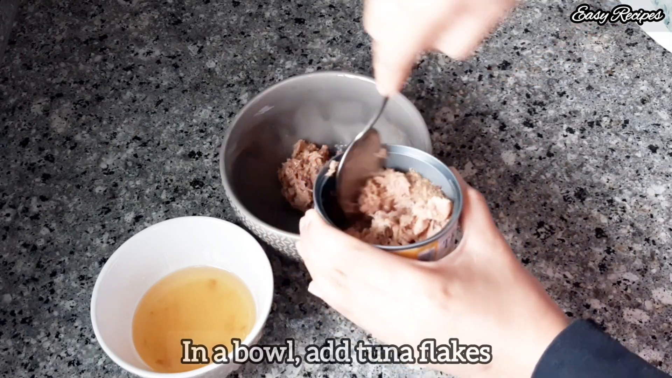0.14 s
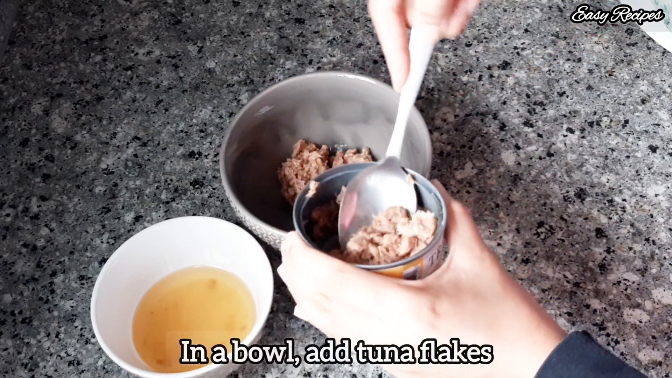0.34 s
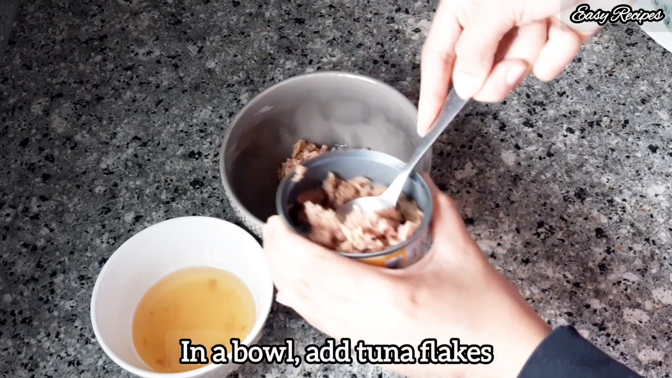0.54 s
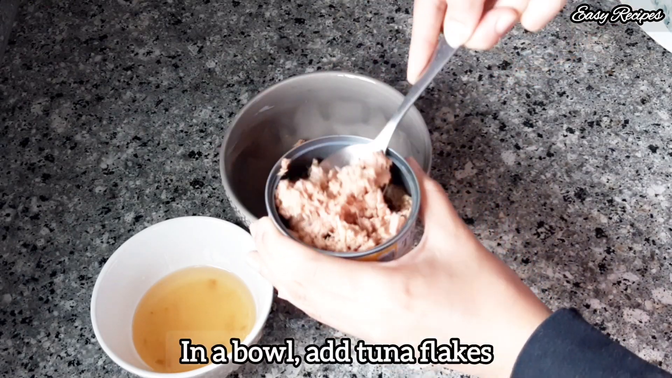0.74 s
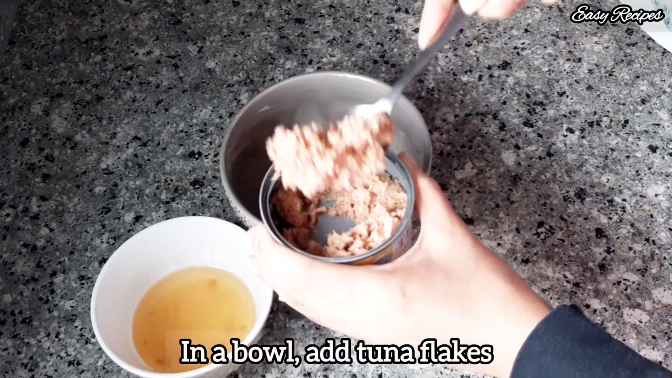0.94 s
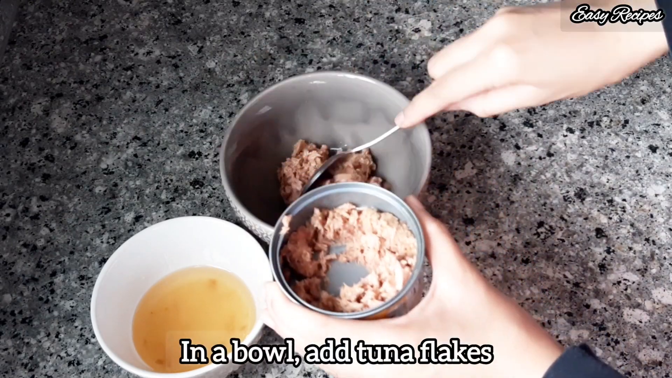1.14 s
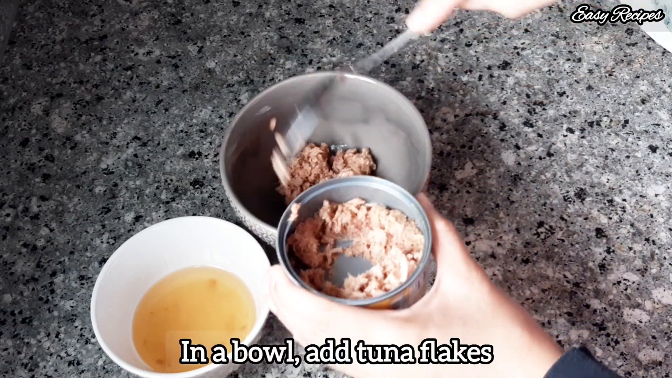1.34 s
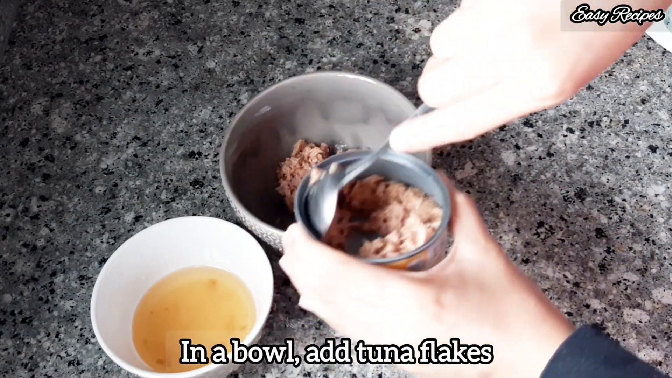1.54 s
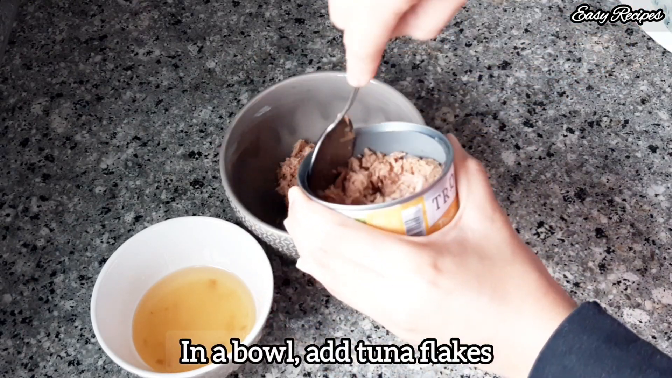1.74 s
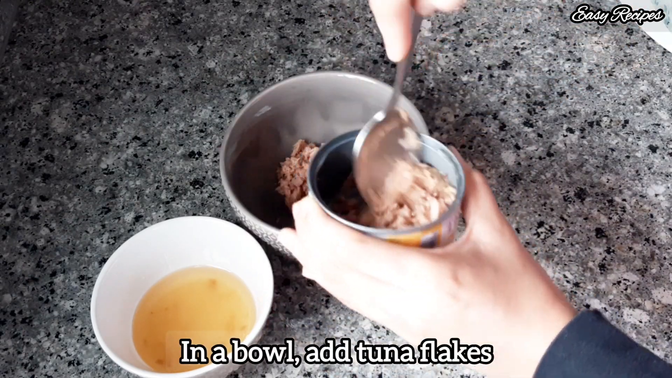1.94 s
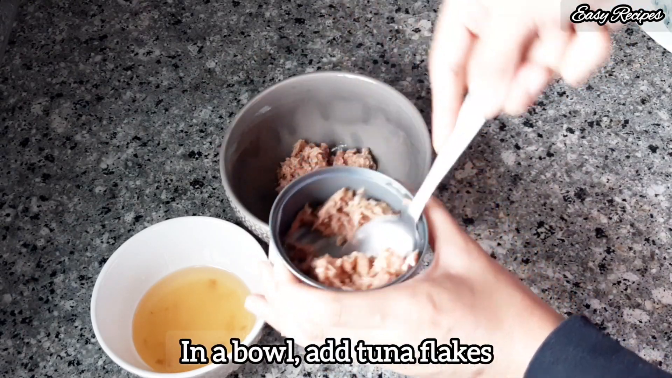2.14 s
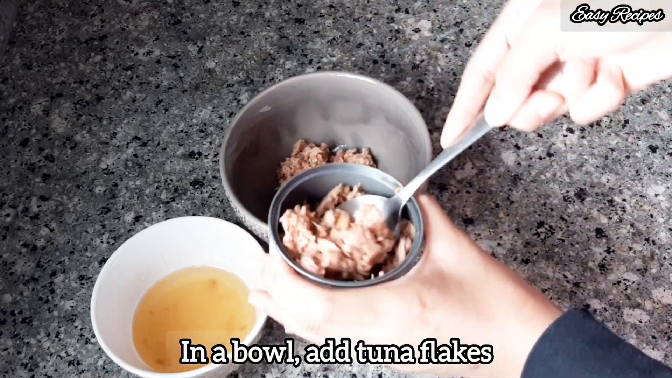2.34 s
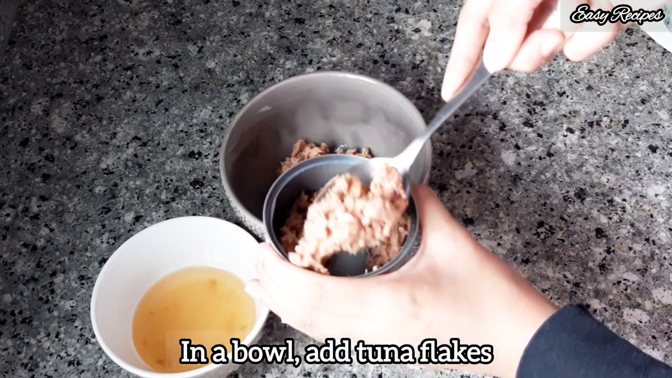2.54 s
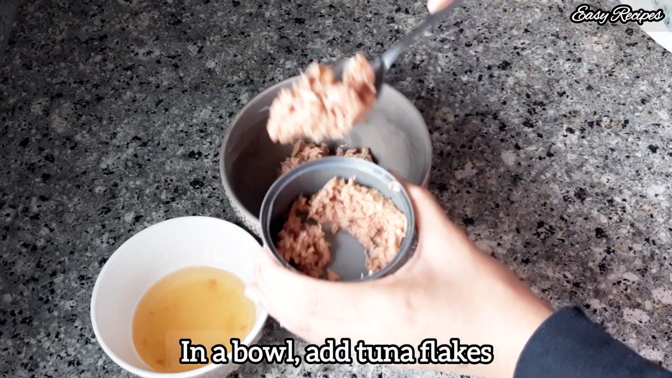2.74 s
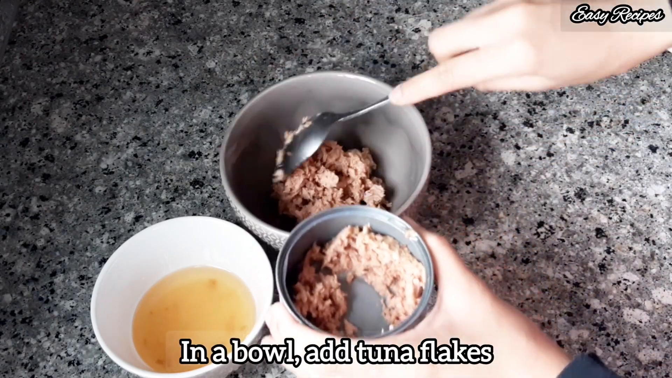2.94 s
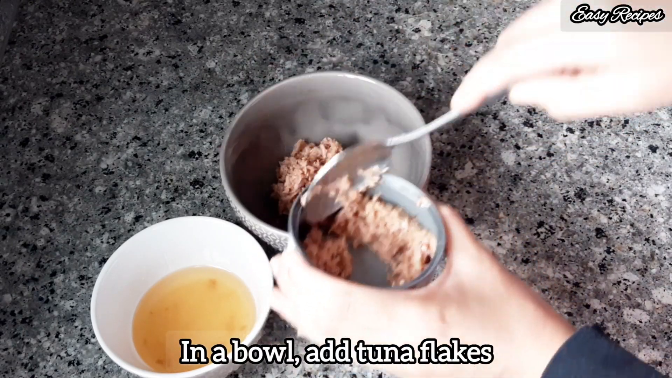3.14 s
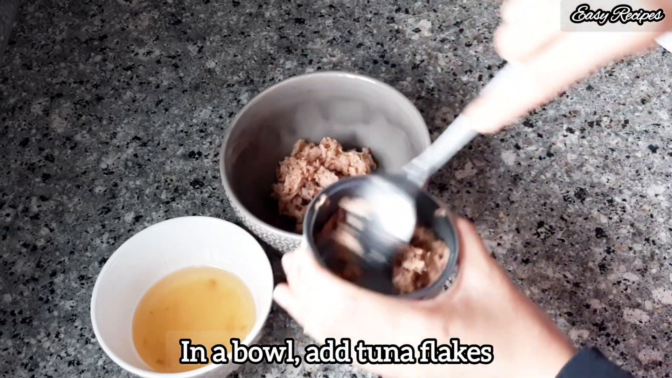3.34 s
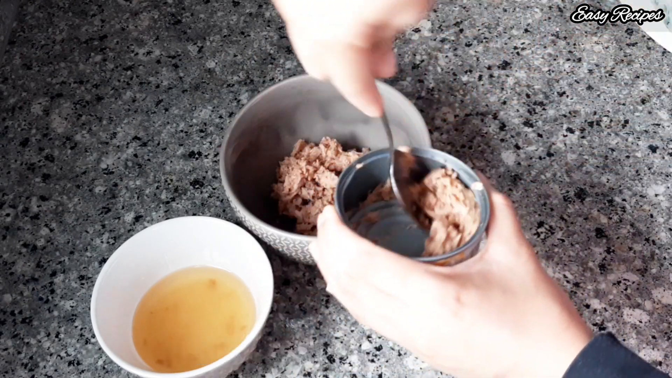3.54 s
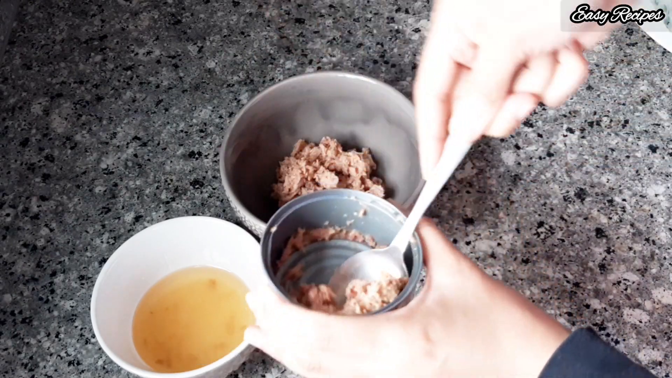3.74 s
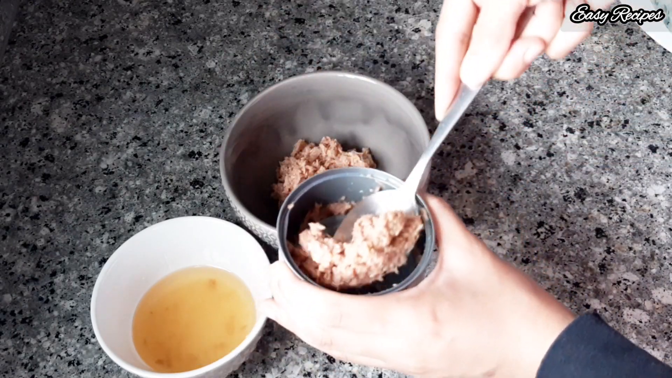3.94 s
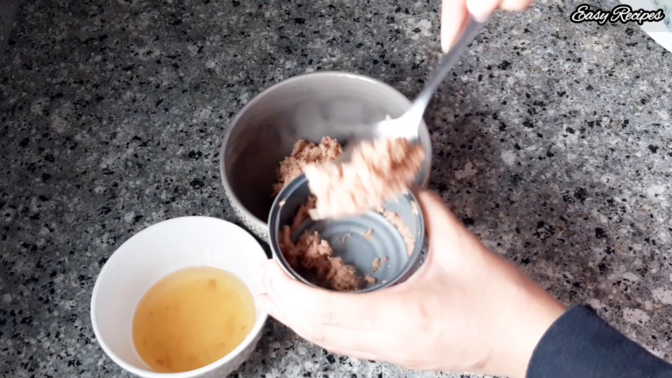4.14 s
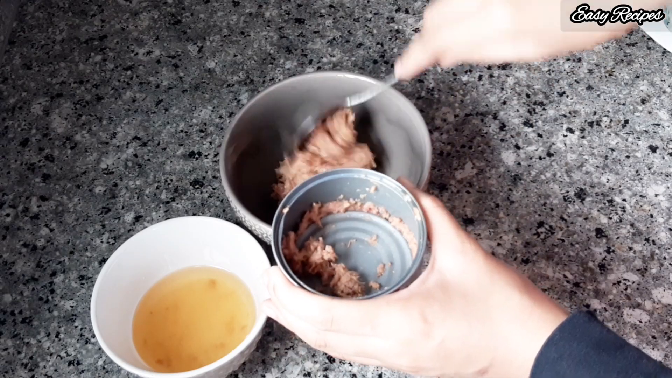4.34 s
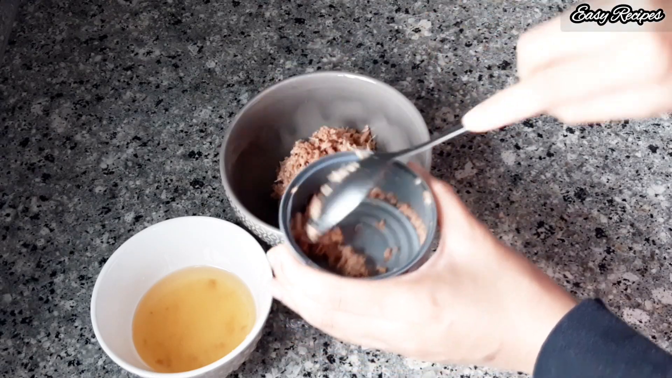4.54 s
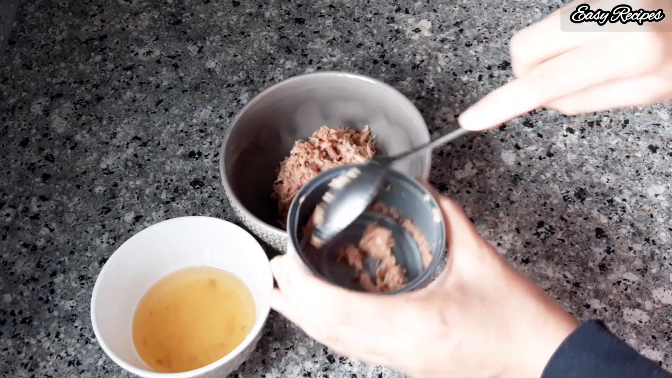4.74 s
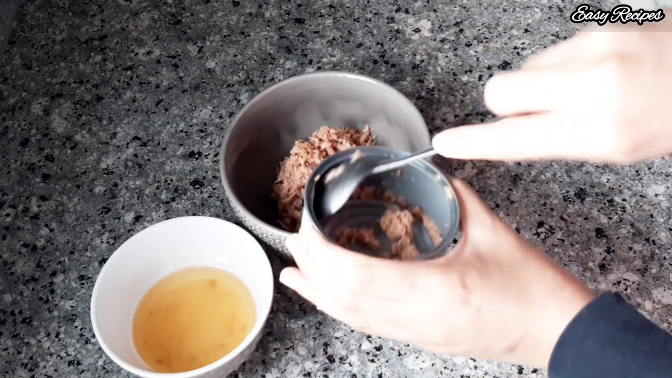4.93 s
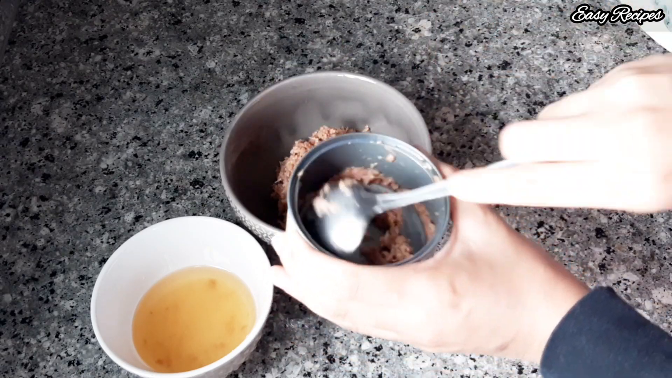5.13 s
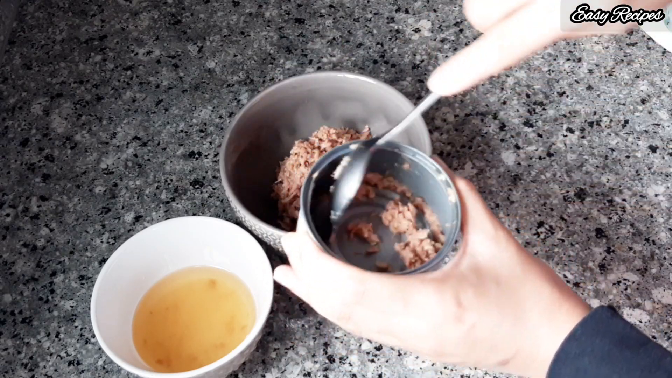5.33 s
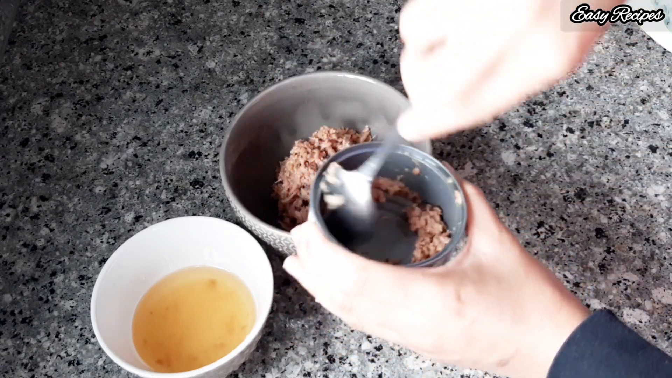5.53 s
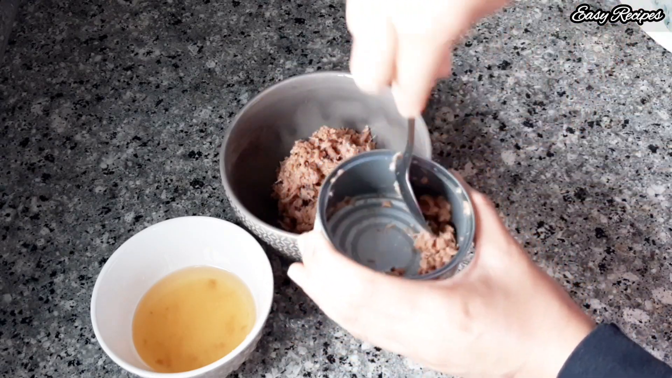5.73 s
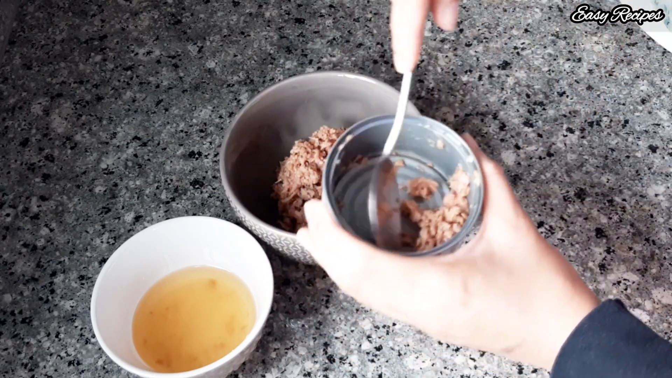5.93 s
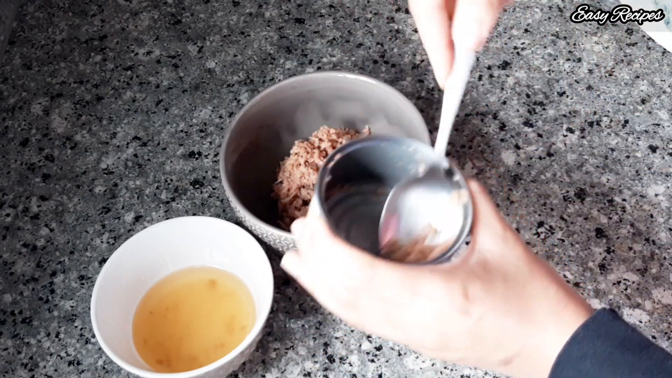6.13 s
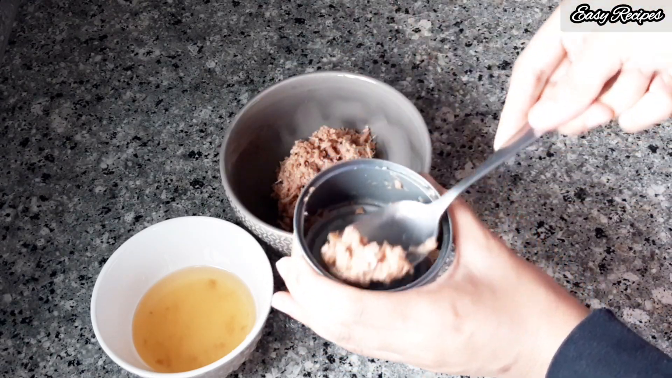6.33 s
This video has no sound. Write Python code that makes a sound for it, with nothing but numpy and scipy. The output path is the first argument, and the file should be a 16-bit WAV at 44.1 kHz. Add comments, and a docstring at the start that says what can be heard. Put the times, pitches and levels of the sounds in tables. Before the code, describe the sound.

A metal spoon knocks and scrapes softly inside a fish-filled tin, then clonks louder and rings more as the tin empties.

```python
"""In a small kitchen with a faint high whine, a steel spoon works in a hand-held tin of fish flakes, close up.
At first packed fish damps the base: light knocks, short scrapes and squeaks, with a wet crackle of flakes.
After 3 s the base is barer for moments, and from 4.8 s it clonks louder and rings longer, to the end.
Each contact is random or pitched force driving resonances of the tin's base, overtones and wall, plus grit.
Two microphones hear the spoon with different close echoes, balance, delay and room tail."""
import sys
import numpy as np
from scipy import signal
from scipy.fft import rfft, irfft, next_fast_len
from scipy.io import wavfile
from scipy.ndimage import map_coordinates

SR = 44100
rng = np.random.default_rng(int(sys.argv[2]) if len(sys.argv) > 2 else 0)


def put_to_file(sound):
    """Save the sound as 16-bit audio at rate SR, in the file named by the first command-line argument."""
    columns = np.atleast_2d(sound).T  # one column per channel
    safe = np.clip(columns, -1, 1)
    whole_steps = np.round(safe * 32767)
    wavfile.write(sys.argv[1], SR, whole_steps.astype(np.int16))


N = 281358  # samples in the scene
SIZE = 8192  # samples in the window of one contact
T = np.arange(SIZE) / SR  # s
HZ = np.fft.rfftfreq(SIZE, 1 / SR)


def amp(db):
    """Decibels to gain."""
    return 10 ** (np.asarray(db) / 20)


def rms(x):
    """Root mean square, kept above zero."""
    return np.sqrt(np.mean(x ** 2) + 1e-20)


def to_level(x, length, db):
    """Bring x to an rms level in dB, taken over its first length seconds."""
    return amp(db) * x / rms(x[:, :int(length * SR)])


def along(points, hz):
    """(Hz, value) points read on a log frequency axis."""
    point_hz, values = np.transpose(points)
    return np.interp(np.log(hz + 1), np.log(point_hz + 1), values)


def filtered(x, response):
    """x times a response of frequency."""
    padded = next_fast_len(N + SR // 2)
    spectrum = rfft(x, padded) * response(np.fft.rfftfreq(padded, 1 / SR))
    return irfft(spectrum, padded)[..., :N]


def causal(points):
    """Minimum-phase response with the given (Hz, dB) colour, so nothing sounds before the contact."""
    cepstrum = irfft(np.log(amp(along(points, HZ))))
    cepstrum[1:SIZE // 2] *= 2
    cepstrum[SIZE // 2 + 1:] = 0
    return np.exp(rfft(cepstrum))


def resonances(modes, hz, stretch=1, damping=0, varied=0):
    """Sum of (Hz, width Hz, dB) modes, retuned, damped and, if varied, excited at chance strengths."""
    total = 0
    for mode_hz, width, db in modes:
        centre = mode_hz * stretch
        damped = width + damping
        chance_db = 2 * varied * rng.normal()
        drive = 1j * hz * np.sqrt(damped * width)
        total = total + amp(db + chance_db) * drive / (centre * centre - hz * hz + 1j * hz * damped)
    return total


def wobble(rate):
    """A smooth random curve over one contact, rate knots a second."""
    return map_coordinates(rng.standard_normal(1024), [T * rate], mode="wrap")


def swell(length, edge):
    """Pressure rises, holds and lets go."""
    rise = np.clip(T / edge, 0, 1)
    return rise * np.clip((length - T) / edge + .5, 0, 1)


def add(track, s, sound):
    """Mix a sound in at time s, cut where it would leave the track."""
    i = round(s * SR)
    part = sound[:, max(-i, 0):max(N - i, 0)]
    first = max(i, 0)
    track[:, first:first + part.shape[1]] += part


def background():
    """Steady room noise with a faint high whine: noise shaped by frequency, partly unlike in the microphones."""
    # Hush of the kitchen. Each row: frequency in Hz, density in dB per Hz.
    quiet = [(15, -57), (25, -17.5), (97, -11), (249, -11.5), (394, -9.5), (677, -15.5), (734, -13),
             (796, -16), (1190, -28), (2160, -39), (2550, -31), (2990, -38), (6740, -37.5), (8830, -43),
             (16000, -34)]
    # Whine, its response applied twice. Each row: frequency in Hz, width in Hz, level in dB per pass.
    whine_modes = [(2600, 340, -1.5), (5230, 300, 1), (6500, 1300, 0)]

    def noise(response, width):
        mid, side = filtered(rng.standard_normal((2, N)), response)
        pair = np.array([mid + width * side, mid - width * side])
        return pair / rms(pair)

    room = noise(lambda f: amp(along(quiet, f)), width=.55)
    whine = noise(lambda f: resonances(whine_modes, f) ** 2, width=1.0)
    return amp(-60.0) * room + amp(-74.0) * whine


def kitchen(x):
    """The room's tail: noise that dies at a rate set by frequency, different at each microphone."""
    # Decay of the room. Each row: frequency in Hz, time to fall 60 dB in seconds.
    decay = [(150, 0.61), (600, 0.16), (1500, 0.18), (4000, 0.2), (9000, 0.12), (16000, 0.14)]
    hz, t, z = signal.stft(rng.standard_normal((2, SR // 2)), SR, nperseg=256)
    dying = z * amp(-60 * t / along(decay, hz)[:, None])
    tail = signal.istft(dying, SR, nperseg=256)[1]
    tail *= np.clip(np.arange(tail.shape[1]) / SR / 0.0013, 0, 1)  # builds up over 1.3 ms
    wet = signal.fftconvolve(x, tail / np.linalg.norm(tail[0]), axes=1)[:, :N]
    colour = [(300, -10.5), (700, -9.5), (1500, -7.5), (3000, -8.5), (12000, -8)]  # (Hz, dB)
    return filtered(wet, lambda f: amp(along(colour, f)))


def placed(x):
    """Sound reaches the left microphone port just before the right; each port has its own colour."""
    # Balance of the ports. Each row: frequency in Hz, left minus right in dB.
    balance = [(100, -3.5), (400, -4.5), (700, -6), (1100, 2.5), (1500, 0), (2400, -2.5), (4500, -1),
               (6300, -3), (8000, 8), (10000, 7), (13000, 2)]

    def ports(f):
        ratio = amp(along(balance, f))
        lag = np.exp(-2j * np.pi * f * 4e-5)  # right port 40 microseconds later
        return np.array([ratio, lag]) * np.sqrt(2 / (1 + ratio ** 2))

    return filtered(x, ports)


def scattered(spectrum, share, t60):
    """Tin, bowl and counter throw a different cluster of close echoes to each microphone."""
    echoes = rng.standard_normal((2, SIZE)) * amp(-60 * T / t60) * (T > .0004)
    echoes = echoes / np.linalg.norm(echoes[0])
    fade = np.clip(10 * (1 - T / T[-1]) - 1, 0, 1)
    return fade * irfft(spectrum * (1 + share * rfft(echoes)))


def flakes():
    """Moist flakes part and land in the bowl with a faint sticky crackle of unsteady noise."""
    # Wet flakes slide off the spoon. Each row: start in seconds, end in seconds, level in dB.
    slides = [(1.153, 1.181, -53), (1.25, 1.285, -55.5), (2.88, 2.875, -53.5), (2.895, 2.948, -68),
              (4.341, 4.426, -66.5)]
    # Colour of the crackle. Each row: frequency in Hz, density in dB per Hz.
    wet_colour = [(600, -18.5), (1500, -13), (3100, -7.5), (5000, -2.5), (8000, -6), (16000, 0)]
    out = np.zeros((2, N))
    for start, end, db in slides:
        force = rng.standard_normal(SIZE) * amp(9.7 * wobble(330)) * swell(end - start, edge=0.007)
        crackle = scattered(rfft(force) * causal(wet_colour), share=1.0, t60=0.037)
        add(out, start, to_level(crackle, end - start, db))
    return out


def narrow(rows, width, edge, share):
    """Short swells of friction locked near one pitch; rows hold start s, end s, pitch Hz, level dB."""
    out = np.zeros((2, N))
    for start, end, pitch, db in rows:
        force = rng.standard_normal(SIZE) * swell(end - start, edge)
        band = resonances([(pitch, pitch * width, 0)], HZ) ** 2
        tone = scattered(rfft(force) * band, share, t60=0.013)
        add(out, start, to_level(tone, end - start, db))
    return out


def squeaks():
    """The spoon's edge sticks and slips on bare metal: noise squeezed into a narrow band."""
    # Squeaks. Each row: start in seconds, end in seconds, pitch in Hz, level in dB.
    slips = [(.033, .06, 8940, -31.5), (.262, .312, 2430, -46.5), (.755, .79, 2700, -51),
             (1.512, 1.535, 2037, -43.5), (1.868, 1.91, 826, -39), (2.19, 2.235, 2130, -42),
             (3.585, 3.645, 1480, -29.5), (4.825, 4.865, 1516, -35), (4.884, 4.906, 3360, -37.5),
             (4.906, 4.918, 1100, -34.5), (5.12, 5.134, 1130, -31.5), (5.19, 5.21, 4090, -35),
             (5.52, 5.535, 1490, -32), (5.587, 5.602, 6930, -31)]
    return narrow(slips, width=0.13, edge=0.006, share=0.48)


def fish_damping(s):
    """Fish left on the base soaks up its ringing: width in Hz added to its resonances at time s."""
    # Fish on the base. Each row: time in seconds, added width in Hz.
    fill = [(0, 300), (2.5, 190), (3.2, 145), (3.6, 11), (4.6, 110), (4.8, 20), (6.4, 7.8)]
    return np.interp(s, *np.transpose(fill))


def fishiness(s):
    """How far fish muffles the tin at time s, 0-1."""
    damping = fish_damping(s)
    return damping / (damping + 23)  # half the muffling at 23 Hz of added width


def friction(pressure, apart):
    """Spectrum of a rough contact force as each microphone hears it; apart = strength of the unlike noise."""
    common, left, right = rng.standard_normal((3, SIZE))
    return rfft(pressure * (common + apart * np.array([left, right])))


def locked(pressure, hz, drift, turn):
    """Spectrum of a chatter in step with one mode; drift and turn (between microphones) in radians."""
    phase = 2 * np.pi * hz * T + drift * wobble(85)  # the pitch bends as the pressure shifts
    return rfft(pressure * np.sin([phase + turn, phase]))


def tin(pressure, s, length, base_hz, wall_hz, levels, rasp, lock):
    """A contact drives base, overtones, wall and grit, each to its rms level over the given length."""
    # Modes of the tin's base. Each row: frequency in Hz, width in Hz, strength in dB.
    base_modes = [(680.5, 80, 11), (800, 50, -23), (910, 84, -15)]
    # Overtones of the base. Each row: frequency in Hz, width in Hz, strength in dB.
    overtone_modes = [(1206, 68.7, -14), (1430, 57, -9), (1453, 91, 28.5), (1612, 66, 3), (1550, 54, -1)]
    # Modes of the wall. Each row: frequency in Hz, width in Hz, strength in dB.
    wall_modes = [(2104, 43, -5), (2330, 104, 9.5), (2745, 74, 6), (2850, 71, -6.5), (3623, 112.6, 1.5),
                  (4004, 56, 2.5), (4454, 440, 1), (5100, 340, -8), (5364, 138, 2.5), (5790, 340, -5.5),
                  (6200, 86, -16.5), (7614, 63, -19.5)]
    # The whole tin flexing in the hand. Each row: frequency in Hz, width in Hz, strength in dB.
    body_modes = [(330, 160, -12), (398, 50, 0)]
    # Toneless rasp beside the wall's ring. Each row: frequency in Hz, density in dB per Hz.
    rasp_colour = [(200, -49), (700, -19), (1300, -13.5), (1950, -14.5), (3200, 6), (4500, -0.5),
                   (6400, -5), (7600, -11), (12000, -55)]
    # Grit in the contact. Each row: frequency in Hz, density in dB per Hz.
    grit_colour = [(3000, -46), (6000, -1.5), (7200, -3), (9000, -6), (11000, -2.5), (13000, -0.5),
                   (15500, -10.5), (17000, 0.5)]

    def level(spectrum):
        part = irfft(spectrum) * np.clip(9 - 10 * T / T[-1], 0, 1)
        return to_level(part, length, 0)

    damping = fish_damping(s)
    stretch = base_hz / 702  # the spoon's pressure stiffens the base; 702 Hz under a light touch
    overtone_stretch = stretch ** .45 * (1 - damping / 1700)
    base = resonances(base_modes, HZ, stretch, damping, varied=0.76)
    base = base * resonances([(base_hz, 380 + 2 * damping, 0)], HZ)
    overtones = resonances(overtone_modes, HZ, overtone_stretch, 1.8 * damping, varied=0.69)
    overtones = overtones * resonances([(1320, 780, 0)], HZ)
    wall = resonances(wall_modes, HZ, 1 + 0.038 * rng.normal(), .55 * damping, varied=0.73)
    wall = wall + rasp * causal(rasp_colour)
    # the point of contact favours one region of the wall
    wall = wall * (1 + 1.38 * resonances([(wall_hz, 550, 0)], HZ))

    # on bare metal the spoon chatters in step with the base, so the tone turns clean
    clean = np.clip(lock * np.exp(-damping / 110), 0, .98)
    base_tone = locked(pressure, base_hz, drift=0.43, turn=0) * resonances([(base_hz, 105, 0)], HZ)
    overtone_hz = 1510 * overtone_stretch
    high_tone = locked(pressure, overtone_hz, drift=0.74, turn=1.0)
    high_tone = high_tone * resonances([(overtone_hz, 80, 0)], HZ)

    slips = pressure * amp(2.2 * wobble(900))
    flexing = friction(slips, 0.1) * resonances(body_modes, HZ) * resonances([(406, 760, 0)], HZ)
    rough_base = level(friction(slips, 1.0) * base)
    rough_overtones = level(friction(slips, .7) * overtones)
    boom = np.sqrt(1 - clean) * rough_base + np.sqrt(clean) * level(base_tone)
    boom = boom + amp(-21.5) * level(flexing)
    ring = np.sqrt(1 - .7 * clean) * rough_overtones + np.sqrt(.7 * clean) * level(high_tone)
    wall_sound = level(friction(slips, 1.0) * wall)
    grit = level(friction(slips, 1.0) * causal(grit_colour))
    parts = [boom, ring, wall_sound, grit]
    return sum(to_level(part, length, db) for db, part in zip(levels, parts))


def catches(curve):
    """Split a scrape into overlapping catches: (start s, length s, pressure, level dB, boom dB)."""
    attack_s, release_s = 0.015, 0.033  # the spoon touches down and lifts off
    times, level_db, boom_db = np.transpose(curve)
    count = max(round((times[-1] - times[0]) / .05), 1)  # about one catch every 50 ms
    centres, step = np.linspace(times[0], times[-1], count + 1, retstep=True)
    for start in centres - step:
        t = start + T
        nearest_end = np.minimum((t - times[0]) / attack_s, (times[-1] - t) / release_s)
        touching = np.clip(nearest_end + .5, 0, 1)
        hump = np.sin(np.pi * np.minimum(T / (2 * step), 1))
        pressure = touching * hump * amp(np.interp(t, times, level_db))
        db = 20 * np.log10(rms(pressure[:int(2 * step * SR)]))
        boom = np.average(np.interp(t, times, boom_db), weights=pressure ** 2)
        yield start, 2 * step, pressure, db, boom


def scrape_levels(wall_db, boom_db, edge_db, fish):
    """Levels of base, overtones, wall and grit; overtones start from half the boom, muffled by fish."""
    overtone_db = boom_db / 2 + 2.5 - 11 * fish  # 2.5 dB up on bare metal; fish takes off 11 dB at most
    return wall_db + np.array([boom_db, overtone_db, 0, edge_db])


def strokes():
    """Dragging is a dense run of tiny slips that clump and chirp at each catch, bumping over the ridges."""
    # The spoon drags over metal and fish. Each row: base pitch in Hz, wall pitch in Hz, grit over wall
    # in dB, and a list of points: time in seconds, level of the wall in dB, base over wall in dB.
    drags = [(755, 4200, 4, [(.01, -40, -3), (.045, -39.5, -1.5), (.068, -47, 3)]),
             (834, 1900, -8, [(.085, -57, 10), (.11, -47, 15), (.135, -56.5, 8)]),
             (780, 3700, -5.5, [(.143, -35.5, -15.5), (.18, -32, -8.5), (.21, -46, 12), (.28, -51, -11),
             (.39, -64, -4.5)]), (730, 3500, 0.5, [(.485, -67, -5), (.545, -65, -6)]),
             (820, 3500, -5.5, [(.64, -60, 11), (.73, -64.5, 8.5), (.768, -42.5, 0), (.8, -66, -2),
             (.87, -66.5, 17)]), (651, 3200, -2, [(1.5, -51.5, -2), (1.6, -63, -1), (1.645, -55, 10),
             (1.69, -65, 9)]), (806, 2550, -3.5, [(1.865, -42.5, -14), (1.9, -45.5, 4.5), (1.925, -56, 5),
             (1.985, -36.5, -7), (2.02, -59, 8)]), (714, 1600, -12, [(2.05, -56, 14), (2.155, -30.5, -6.5),
             (2.18, -51, -12), (2.21, -39, 7.5), (2.265, -61.5, 7)]), (820, 2450, -5.5, [(2.275, -55.5, 4),
             (2.335, -42, 7.5), (2.38, -67, 23), (2.44, -46, 1.5), (2.47, -70.5, -2)]),
             (715, 3900, 1, [(3.165, -34.5, 5), (3.185, -34.5, 1), (3.205, -57.5, 7), (3.225, -33.5, -5.5),
             (3.265, -38.5, 5), (3.31, -25, -8), (3.34, -50, 4)]), (670, 3200, 1.5, [(3.43, -54, -1),
             (3.463, -26.5, -1), (3.49, -47, -1)]), (677, 2600, -5.5, [(3.505, -47, 11), (3.555, -32.5, -2),
             (3.595, -33.5, 2.5), (3.635, -32, 12.5), (3.67, -45, 6), (3.695, -35.5, -18),
             (3.735, -41.5, 14.5), (3.81, -61.5, 0)]), (643, 2350, -10, [(3.83, -58.5, 13),
             (3.895, -45, 3.5), (3.92, -62.5, 0), (3.96, -55, 1)]), (636, 2800, 3, [(4.675, -44, 4),
             (4.7, -36.5, -10.5)]), (690, 3400, -2, [(4.83, -38, 7), (4.875, -28.5, -14), (4.925, -40, -6),
             (4.975, -61, -4), (5.04, -36.5, 9)]), (780, 2550, -6, [(5.145, -55.5, -15), (5.215, -27.5, -4),
             (5.25, -36.5, -4.5), (5.29, -59.5, 4)]), (725, 2300, -2, [(5.355, -36, 4), (5.395, -42.5, -2),
             (5.43, -49.5, -2)]), (800, 3000, 0.5, [(5.48, -51, 3), (5.555, -50.5, -2),
             (5.58, -30.5, 6.5)]), (698, 3400, -2.5, [(5.66, -53.5, -5), (5.75, -48.5, 1), (5.78, -51, 33),
             (5.828, -41, -22)]), (690, 2700, -6, [(5.926, -31.5, 5), (5.99, -39, 1), (6.02, -41, 5),
             (6.07, -49, 16.5), (6.125, -38.5, 12), (6.165, -42, -10), (6.235, -56, 2), (6.262, -45, 5.5),
             (6.3, -67, 6)])]
    # The ridges of the base shake the held tin. Each row: time in seconds, rate of crossing them in Hz,
    # level relative to the base in dB.
    ridges = [(2.1, 128, -26.5), (3.3, 150, -24.5), (3.58, 80, -30.5), (3.8, 66, -15), (5.2, 85, -31),
              (5.9, 110, -29), (6.05, 118, -16)]
    pitch_scatter = 0.026  # fraction; the base is stiffened a little differently at every catch
    wall_scatter, chirp_scatter = .13, .35  # octaves; the point of contact wanders
    out, bumps, chirps = np.zeros((2, N)), [], []
    ridge_s, ridge_hz, ridge_db = np.transpose(ridges)
    for base_hz, wall_hz, edge_db, curve in drags:
        for start, length, pressure, db, boom_db in catches(curve):
            fish = fishiness(start + length / 2)
            levels = scrape_levels(db, boom_db, edge_db, fish)
            pitch = base_hz * (1 + pitch_scatter * rng.normal())
            region = wall_hz * 2 ** (wall_scatter * rng.normal())
            slips = pressure * amp(2.8 * wobble(190))  # slips clump
            rasp = 0.2 + 0.33 * fish  # rasp on bare metal, and what fish adds
            add(out, start, tin(slips, start, length, pitch, region, levels, rasp, lock=0.63))

            bump_db = db + boom_db + np.interp(start, ridge_s, ridge_db)
            bumps.append((start, start + length, np.interp(start, ridge_s, ridge_hz), bump_db))
            hardest = start + T[np.argmax(slips)]
            chirp_hz = wall_hz * 2 ** (chirp_scatter * rng.normal())
            chirps.append((hardest, hardest + 0.013, chirp_hz, db - 3))  # 3 dB under the wall
    thrum = narrow(bumps, width=.55, edge=.03, share=.2)
    return out + thrum + narrow(chirps, width=0.041, edge=0.0052, share=0.82)


def knocks():
    """Each blow is a sharp contact followed by a dying chatter of the spoon's edge."""
    # The spoon strikes the tin. Each row: time in seconds, chatter length in seconds (a fall of 36 dB),
    # base pitch in Hz, level of the base in dB, overtones over base in dB, wall over base in dB.
    blows = [(.033, .023, 716, -36, -22, -5), (0.076, 0.019, 790, -26.5, -25, -16),
             (0.572, 0.025, 693, -28, -23.5, 2.5), (0.877, 0.021, 726, -70, 7, 12),
             (1.43, .08, 862, -32.5, -8.5, 4.5), (1.827, 0.0314, 661, -42, -10.5, 2.5),
             (2.5, 0.057, 659, -46.5, -6.5, -38), (3.154, 0.021, 720, -29.5, -17.5, -17),
             (3.38, 0.067, 885, -38.5, -4.5, 1), (3.407, 0.0046, 654, -34, -9, -17.5),
             (3.529, 0.024, 707, -27.5, -14, -16.5), (4.593, 0.0402, 742, -30.5, -17, -4),
             (4.659, 0.055, 706, -36, -26, -4.5), (4.781, 0.037, 691.7, -9, -3.5, -9),
             (4.817, 0.0399, 759, -24.5, 2.5, -6.5), (5.008, 0.02, 781, -26, -11, -5.5),
             (5.069, 0.022, 686, -36, 0, 6.5), (5.096, 0.0224, 652, -23.5, -16, -23.5),
             (5.121, 0.029, 738, -30, -12, -1.5), (5.184, 0.049, 684, -16.5, -15, -20.5),
             (5.196, .04, 721, -20, -20, -19), (5.216, 0.0349, 784, -20, -0.5, -10),
             (5.328, 0.032, 693, -16, -2, -10), (5.4, .051, 691, -22, -11.5, -12.5),
             (5.49, .03, 726, -31.5, -29, -10), (5.516, 0.023, 750, -22.5, 0, -11.5),
             (5.551, 0.049, 696, -41.5, 6, 2), (5.586, 0.033, 688, -16.5, -3.5, -7.5),
             (5.907, 0.043, 783, -14, -7, -14), (6.025, .018, 687, -28, -22, -7.5),
             (6.093, .045, 693, -24.5, -38, -19), (6.127, 0.061, 685.7, -24.5, -31, -19.5)]
    out = np.zeros((2, N))
    for s, chatter, base_hz, db, overtone_db, wall_db in blows:
        pressure = amp(-36 * T / chatter) * (1 - np.exp(-T / .001))  # contact builds in about 1 ms
        # every blow lands at about the same angle: grit stays 4 dB under the wall
        levels = db + np.array([0, overtone_db, wall_db, wall_db - 4])
        # the more a blow lands on the wall, the higher it rings there: an octave per 52 dB
        wall_hz = 2980 * 2 ** (wall_db / 52)
        add(out, s, tin(pressure, s, .017, base_hz, wall_hz, levels, rasp=.18, lock=1.03))
    return out


def scene():
    """Spoon, tin and flakes close to the microphones, with the kitchen around them."""
    spoon = placed(knocks() + strokes() + flakes() + squeaks())
    return spoon + kitchen(spoon) + background()


def record(dry):
    """Peaks past full scale clip; then nothing is kept from 16.2 kHz up."""
    return filtered(np.clip(dry, -1, 1), lambda f: f < 16200)


dry = scene()
out = record(dry)
put_to_file(out)
```